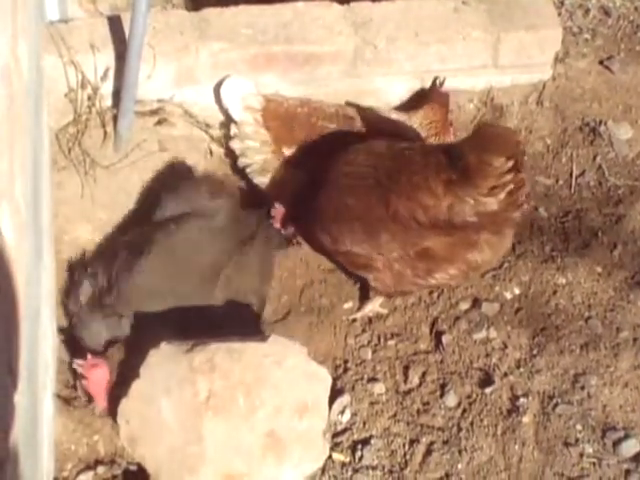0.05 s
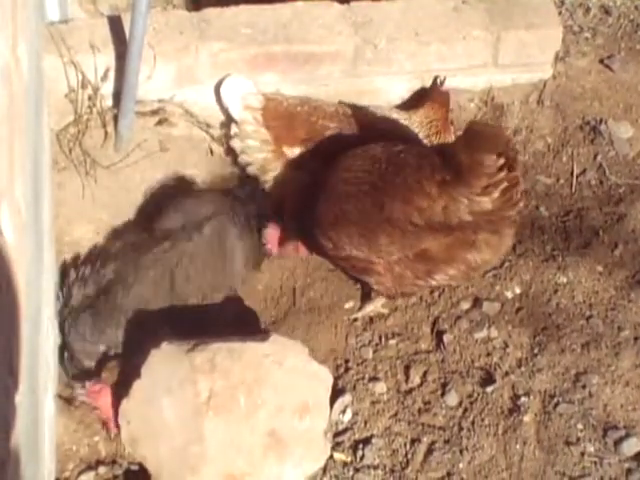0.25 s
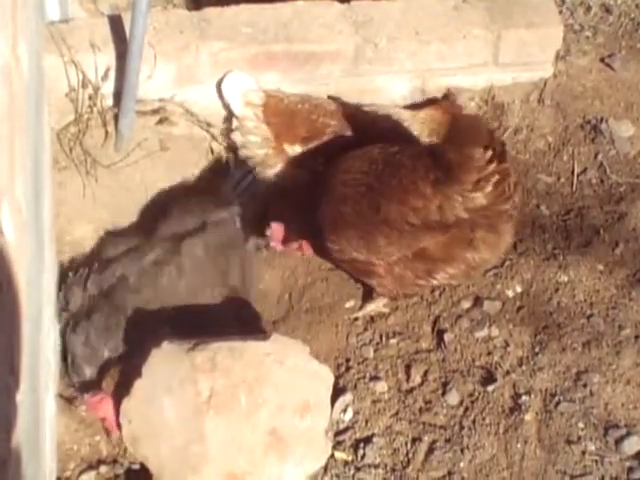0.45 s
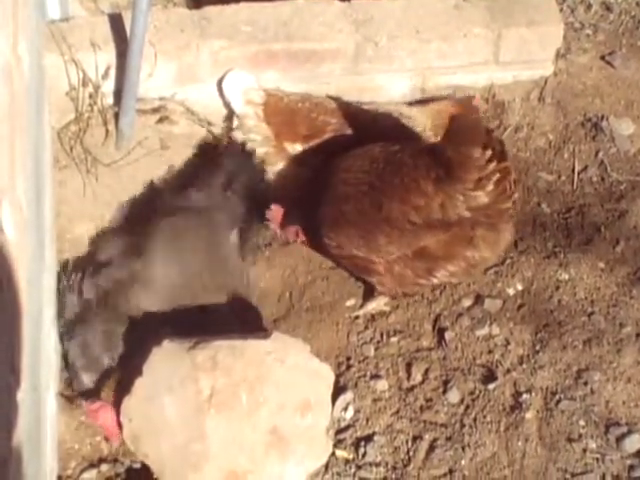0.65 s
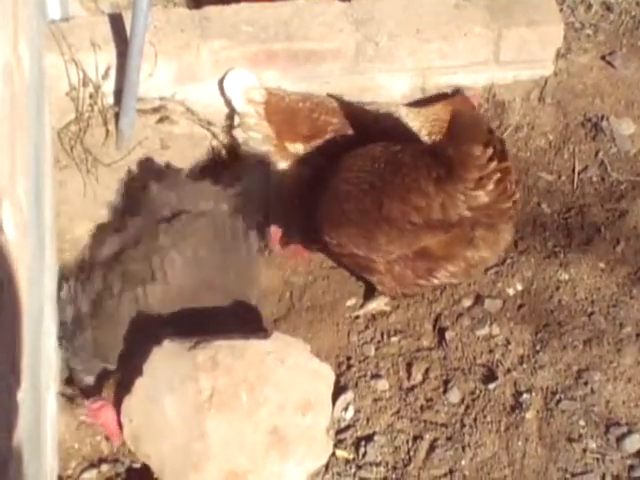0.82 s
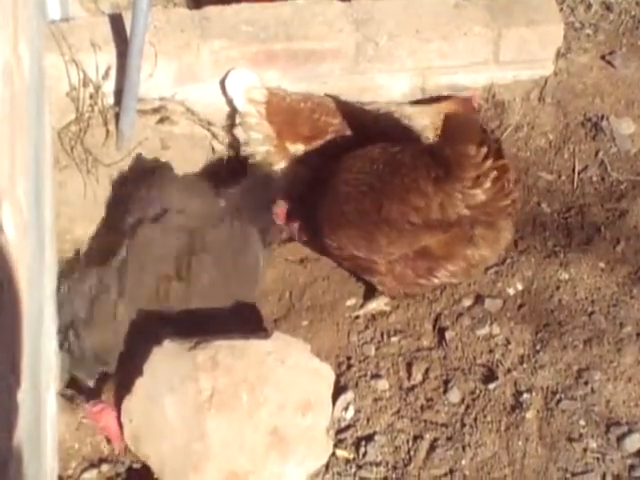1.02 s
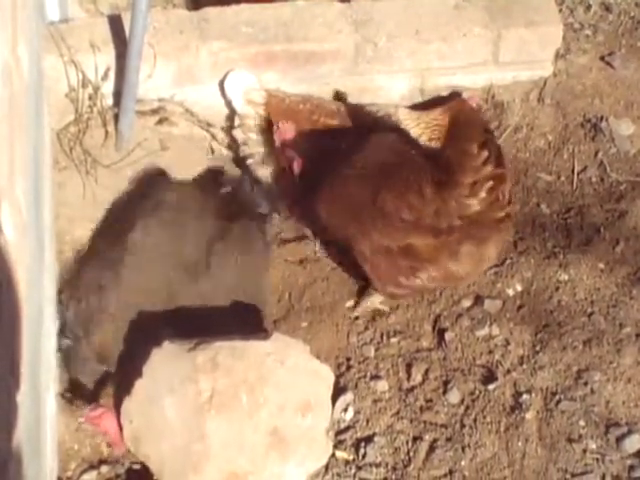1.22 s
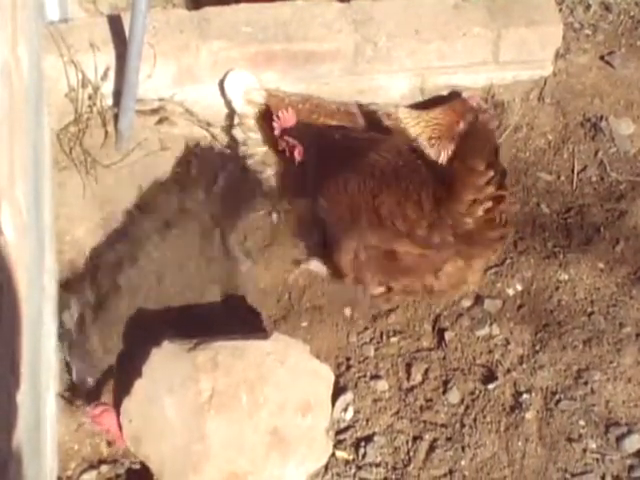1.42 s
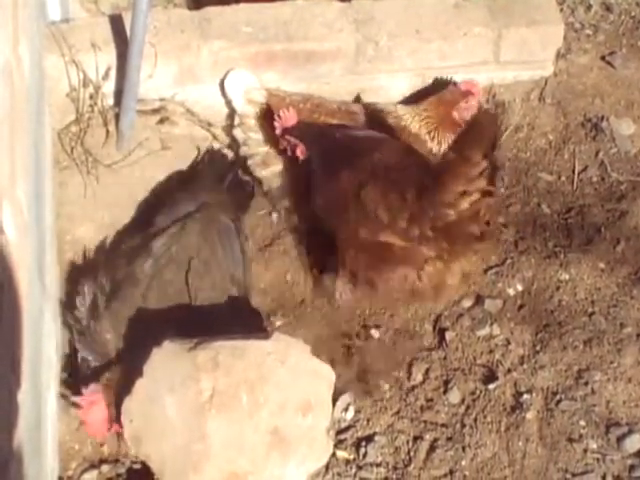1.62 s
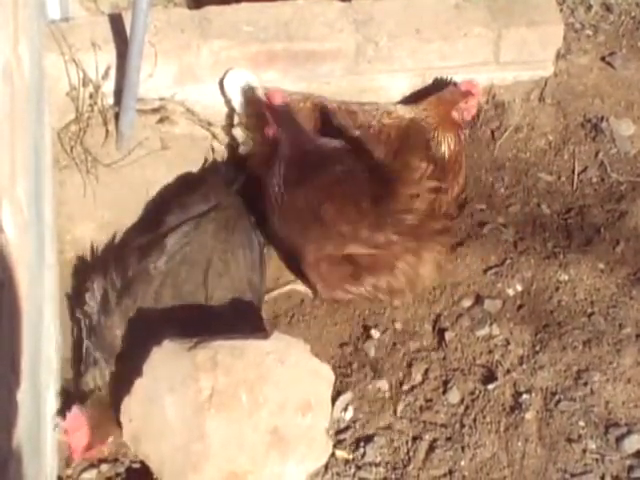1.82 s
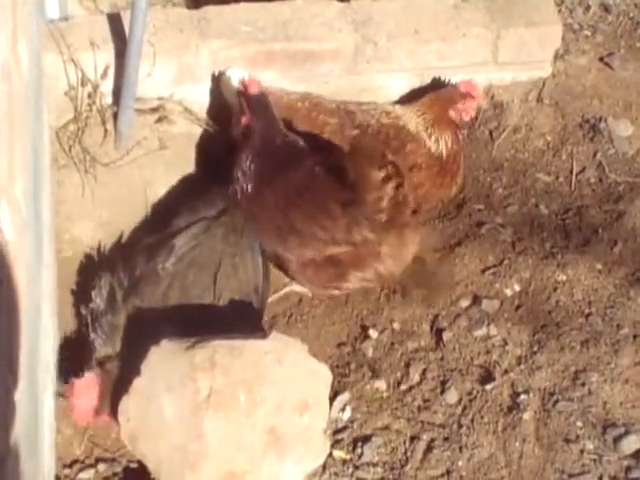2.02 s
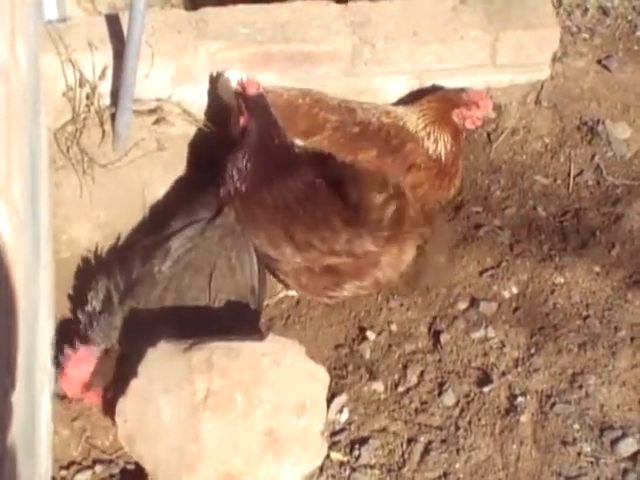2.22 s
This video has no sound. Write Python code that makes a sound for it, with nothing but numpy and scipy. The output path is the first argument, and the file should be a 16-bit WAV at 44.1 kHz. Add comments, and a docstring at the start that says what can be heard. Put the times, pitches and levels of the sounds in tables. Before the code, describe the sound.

Hens take a dust bath close to the microphone, outdoors. Wings and feet sweep dry soil in quick rasping strokes with soft thuds, pattering grit and pebble clicks, then ease into light feather rustling over a quiet rumble.

```python
"""Beside a wall, in dry soil, hens take a dust bath close to the listener.
Wings and feet sweep the dirt in pairs of strokes: friction makes a rasp of many tiny impacts,
the ground thuds softly, and thrown grit patters down. Plumage rustles, a foot scuffs,
pebbles click and a beak or claw taps on stone. Behind them lie a quiet rumble and a faint low hum."""
import sys
import numpy as np
from scipy.fft import rfft, irfft, next_fast_len
from scipy.io import wavfile
from scipy.ndimage import map_coordinates

SR = 44100
rng = np.random.default_rng(int(sys.argv[2]) if len(sys.argv) > 2 else 0)


def wrap_up_sound(samples):
    """Save the sound to the file named by the first command line argument, as 16-bit audio."""
    columns = np.atleast_2d(samples).T
    # keep every value between -1 and 1, then stretch to whole-number steps
    tamed = np.clip(columns, -1, 1)
    steps = np.round(tamed * 32767).astype(np.int16)
    wavfile.write(sys.argv[1], SR, steps)


N = 103635
T = np.arange(N) / SR

# Spectra of fine dust, coarse crumbs and soft thuds: f/Hz, relative density level/dB
DUST_SPECTRUM = [(900, -47), (2000, -18.5), (2600, -10.5), (3300, -4.5), (3900, -7), (4900, -0.5),
                 (5300, -1.5), (6600, 2), (7400, -2), (8500, -7.5), (10000, -6.5), (12000, -16),
                 (14500, -36), (16000, -98)]
CRUMB_SPECTRUM = [(120, -17), (350, 0.5), (620, -4.5), (880, -0.5), (1170, 4.5), (1450, 1), (1750, 3.5),
                  (2300, -4.5), (3500, -16.5), (8000, -11.5)]
THUD_SPECTRUM = [(60, -28), (120, -6), (170, -2.5), (230, -3.5), (285, 2), (325, -16), (385, -1), (450, -3),
                 (530, -15.5), (2000, -40)]
# Likeness of a nearby sound at the two microphone ports: f/Hz, coherence
NEAR_COHERENCE = [(100, 0.96), (2000, 0.96), (6500, 1), (8400, 0.96), (10000, 0.98), (12000, 0.96),
                  (15000, 0.31)]


def amp(db):
    """Amplitude ratio of a level in decibels."""
    return 10 ** (np.asarray(db) / 20)


def along(points, hz):
    """Interpolation of (f/Hz, value) points on a logarithmic frequency axis."""
    f, value = np.transpose(points)
    return np.interp(np.log(hz + 1), np.log(f + 1), value)


def filtered(x, response):
    """Linear filtering: the spectrum is multiplied by a frequency response."""
    size = next_fast_len(N + 8192)
    return irfft(rfft(x, size) * response(np.fft.rfftfreq(size, 1 / SR)), size)[..., :N]


def wobble(rate):
    """Random modulation: a spline through rate Gaussian knots a second."""
    return map_coordinates(rng.standard_normal(int(N * rate / SR) + 4), [T * rate])


def stereo(pair, spectrum, coherence=NEAR_COHERENCE):
    """Partial coherence: two signals are coloured and mixed as mid and side, to rms 1."""
    def response(hz):
        angle = np.arccos(np.clip(along(coherence, hz), 0, 1)) / 2
        return amp(along(spectrum, hz)) * [np.cos(angle), np.sin(angle)]
    mid, side = filtered(pair, response)
    channels = np.array([mid + side, mid - side])
    return channels / np.sqrt(np.mean(channels ** 2) + 1e-20)


def hiss(spectrum, coherence=NEAR_COHERENCE):
    """Gaussian noise, spectrally shaped, in stereo."""
    return stereo(rng.standard_normal((2, N)), spectrum, coherence)


def grains(spectrum, rate, spread_db):
    """Shot noise: rate random impacts a second, log-normal in size."""
    sizes = amp(spread_db * np.clip(rng.standard_normal(N), -2, 2))
    hits = rng.random(N) < rate / SR
    return stereo(sizes * hits * rng.choice([-1, 1], (2, N)), spectrum)


def envelope(start, hold, rise, fall):
    """Exponential growth up to start, a hold, then decay; rise and fall are time constants in s."""
    return np.exp(np.minimum(T - start, 0) / rise - np.maximum(T - start - hold, 0) / fall)


def power_sum(events, rise, fall):
    """Incoherent addition: the envelopes of events (t/s, hold/s, level/dB) add in power."""
    return np.sqrt(sum((amp(db) * envelope(t, hold, rise, fall)) ** 2 for t, hold, db in events))


def outdoors():
    """A diffuse field, losing coherence in the treble: distant rumble, with a slightly unsteady hum."""
    # f/Hz, relative density level/dB
    rumble_spectrum = [(15, -55), (25, -15), (38, -31), (112, -4), (146, -10), (331, -13.5), (400, -22.5),
                       (525, -15), (1040, -20.5), (3000, -27.5), (5000, -28.5), (8000, -41), (15000, -40)]
    # f/Hz, coherence
    diffuse_coherence = [(50, .96), (100, 1), (250, 0.38), (700, 0.66), (2000, 0.27), (8000, .1)]
    # f/Hz, level/dB
    hum_partials = [(53, -66.5), (79.5, -65.5), (840, -73.5)]
    hum = np.zeros(N)
    for hz, db in hum_partials:
        peak = np.sqrt(2) * amp(db + 1.3 * wobble(3.5))
        hum += peak * np.sin(2 * np.pi * hz * T + 1.8 * wobble(4.58))
    return amp(-59) * hiss(rumble_spectrum, diffuse_coherence) + hum


def taps():
    """Damped vibration: a beak or claw on stone rings one brief tone, rough with phase jitter."""
    # t/s, level/dB, f/Hz
    strikes = [(.474, -43.5, 2220), (1.778, -44.5, 2950), (2.075, -51, 2260), (2.222, -49.5, 1230)]
    t60_s = 0.022
    out = np.zeros(N)
    for t, db, hz in strikes:
        tone = np.sin(2 * np.pi * hz * (T - t) + wobble(900))
        out += amp(db) * envelope(t, 0, rise=0.00055, fall=t60_s / np.log(1000)) * tone
    return out


def feathers():
    """Friction noise: plumage keeps up a hiss and a low ruffle, with ticks of falling dust."""
    # t/s, level/dB
    rubbing_contour = [(0, -62.5), (.1, -57.5), (.2, -53.5), (.35, -55), (.43, -50.5), (.59, -45),
                       (.65, -51.5), (.76, -38.5), (.86, -45.5), (1.09, -50), (1.19, -38.5), (1.335, -51),
                       (1.46, -44), (1.65, -49.5), (1.74, -48), (1.85, -52), (1.93, -56.5), (2.02, -58.5),
                       (2.11, -54.5), (2.18, -59), (2.26, -56), (2.35, -59.5)]
    rubbing = amp(np.interp(T, *np.transpose(rubbing_contour)) + 2 * wobble(36.56))
    dust = amp(-10.5) * grains(DUST_SPECTRUM, rate=360, spread_db=5.5)
    crumbs = amp(-11) * grains(CRUMB_SPECTRUM, rate=900, spread_db=1)
    rustle = amp(-4) * hiss(DUST_SPECTRUM)
    ruffle = amp(-11.5) * hiss(THUD_SPECTRUM)
    return rubbing * (rustle + ruffle + dust + crumbs)


def scuffs():
    """Sliding friction: a foot drags briefly, hissing in the dust and scraping lower over crumbs."""
    # t/s, hold/s, rasp level/dB, scrape level/dB
    drags = [(2.03, 0.0071, -43.5, -47.5), (2.076, 0.0027, -54.5, -58.5)]
    # f/Hz, relative density level/dB
    crumbs = [(300, -22), (900, -14), (1400, 2.5), (2200, -1.5), (3200, -10.5), (7000, -18)]
    dust = [(2000, -27), (3500, -14), (4600, 2.5), (6000, 1), (7200, -0.5), (8500, -7),
            (11000, -11), (15500, -37)]
    rise_s, fall_s = 0.0058, 0.0099
    rasp = power_sum([(t, hold, db) for t, hold, db, _ in drags], rise_s, fall_s)
    scrape = power_sum([(t, hold, db) for t, hold, _, db in drags], rise_s, fall_s)
    return rasp * hiss(dust) + scrape * hiss(crumbs)


def pebbles():
    """Hard impact: an impulse, its reflection off the ground and scattering from the stones around."""
    # t/s, level/dB, gain above 8 kHz/dB
    contacts = [(.2405, -24, -2), (.300, -29, -21), (0.861, -27.5, 14), (0.871, -29, 14), (1.0037, -24, -8),
                (1.012, -25, -11), (1.1238, -19, -6), (1.294, -25, -6), (1.3902, -30, -11), (1.408, -28, 0),
                (1.5805, -28, 2), (1.587, -15.5, 5), (1.5879, -16, 4), (1.5912, -18, -1),
                (1.6082, -15, -27), (1.612, -20.5, -25), (1.713, -36, -4), (1.797, -27.5, -6),
                (1.8282, -31, -1), (1.874, -31.5, -1), (2.0073, -37, -4), (2.07, -40, 0)]
    # f/Hz, relative density level/dB
    pebble_spectrum = [(200, -38), (1200, -21), (2400, -17), (3500, -7.5), (5000, -2.5), (6300, -0.5),
                       (7600, -8), (9000, -7), (11000, -7.5), (15500, -24)]
    scatter_t60_s, scatter_db = 0.005, -8
    reflection_s, reflection_gain = 0.001, 0.8
    out = np.zeros((2, N))
    for t, db, treble_db in contacts:
        onset = int(t * SR)
        decay = (T >= t) * amp(-60 * np.abs(T - t) / scatter_t60_s)
        scatter = decay * rng.standard_normal((2, N))
        crack = amp(scatter_db) * scatter / np.linalg.norm(scatter[0])
        crack[0, onset] += 1  # row 0 becomes the mid signal
        crack[0, onset + int(reflection_s * SR)] += reflection_gain
        click = stereo(crack, [(hz, level + treble_db * (hz > 8000)) for hz, level in pebble_spectrum])
        out += amp(db) * click / np.abs(click).max()
    return out


def bumps():
    """Soft impact: a wing or breast on the ground gives a few low cycles, an overtone and a puff."""
    # t/s, level/dB, f/Hz
    pushes = [(.2, -52, 190), (.228, -49, 220), (0.273, -46, 265), (.316, -48, 274), (0.515, -43.5, 225),
              (0.563, -45, 260), (0.71, -38.5, 270), (.793, -45, 247), (1.009, -36, 255), (1.141, -44, 200),
              (1.22, -34.5, 276), (1.496, -38.5, 210), (1.594, -41, 243), (2.255, -49, 263)]
    overtone_hz = 413
    puff = amp(-6) * hiss(THUD_SPECTRUM)
    out = np.zeros((2, N))
    for t, db, hz in pushes:
        tone = np.cos(2 * np.pi * hz * (T - t))
        overtone = amp(-5.5) * np.sin(2 * np.pi * overtone_hz * (T - t))
        out += amp(db) * envelope(t, 0, rise=0.0063, fall=0.0033) * (tone + overtone + puff)
    return out


def sweeps():
    """Granular friction: feathers rasp through dust and scrape crumbs; thrown grit then patters down."""
    # t/s, hold/s, rasp level/dB, scrape level/dB
    strokes = [(0.239, 0.01, -43.5, -55.5), (0.297, 0.079, -46.5, -57.5), (0.48, 0.079, -39.5, -52.5),
               (0.694, 0.029, -36.5, -47), (.778, 0.034, -43, -47.5), (0.845, 0.011, -42.5, -54),
               (0.922, 0.018, -33.5, -39.5), (1.001, 0.02, -35, -44), (1.039, 0.026, -47, -47.5),
               (1.133, 0.032, -36.5, -46.5), (1.226, 0.035, -36.5, -47), (1.266, 0.026, -51, -49.5),
               (1.386, 0.03, -32.5, -42.5), (1.494, 0.024, -37.5, -43), (1.59, 0.039, -41.5, -53.5),
               (1.712, 0.016, -48, -57.5)]
    lead_in_s, rise_s, fall_s = 0.018, 0.016, 0.015
    grit_db, flight_s, settle_s = -7, 0.024, 0.1
    rasp = power_sum([(t, hold, db) for t, hold, db, _ in strokes], lead_in_s, fall_s)
    scrape = power_sum([(t, hold, db) for t, hold, _, db in strokes], rise_s, fall_s)
    landings = [(t + hold + flight_s, 0, db + grit_db) for t, hold, db, _ in strokes]
    patter = power_sum(landings, rise_s, settle_s)
    catching = amp(1.12 * wobble(130))
    dust = grains(DUST_SPECTRUM, rate=14000, spread_db=4.5)
    crumbs = grains(CRUMB_SPECTRUM, rate=5000, spread_db=2.5)
    body = amp(-4.5) * hiss(THUD_SPECTRUM)
    fine_grit = grains(DUST_SPECTRUM, rate=5000, spread_db=5.5)
    coarse_grit = amp(-12.5) * grains(CRUMB_SPECTRUM, rate=1500, spread_db=7)
    friction = rasp * dust + scrape * (crumbs + body)
    return catching * friction + patter * (fine_grit + coarse_grit)


def scene():
    """Superposition of the bathing hens and the outdoor background."""
    return sweeps() + bumps() + feathers() + scuffs() + pebbles() + taps() + outdoors()


def record(dry):
    """Frequency response: two band-limited microphone ports colour and delay the sound unequally."""
    # f/Hz, left minus right level/dB
    imbalance = [(100, 3.5), (1200, 2), (4000, 1), (6500, 0), (7400, -0.5), (8300, -7.5), (9100, 0.5),
                 (10000, 8.5), (10900, 6.5), (12000, 12.5), (15000, 3.5)]
    # f/Hz, phase lead of left over right/rad
    phase_lead = [(7000, 0), (8000, 0.87), (8500, 1.3), (9200, 2), (10000, 1.87), (11000, 1.35),
                  (13500, 0.6)]
    cutoff_hz = 15600
    sides = np.array([[0.5], [-0.5]])

    def response(hz):
        gain = amp(sides * along(imbalance, hz))
        phase = sides * along(phase_lead, hz)
        return gain * np.exp(1j * phase) * (hz < cutoff_hz)
    return filtered(dry, response)


dry = scene()
out = record(dry)
wrap_up_sound(out)
```